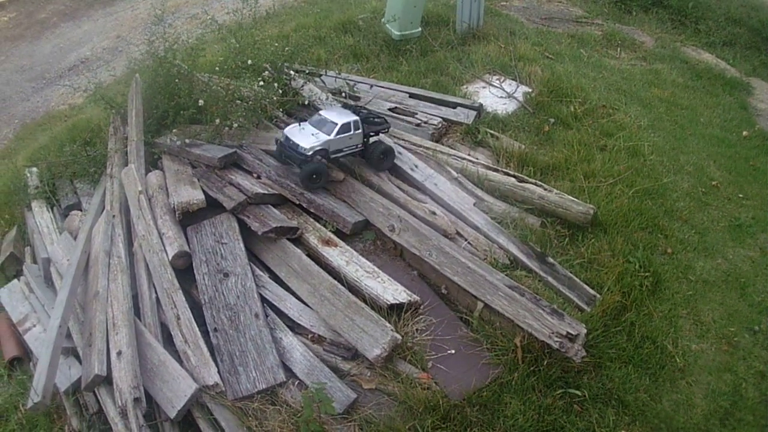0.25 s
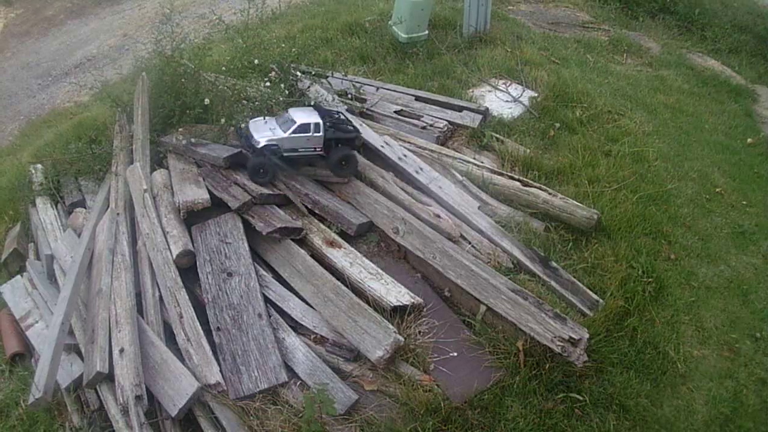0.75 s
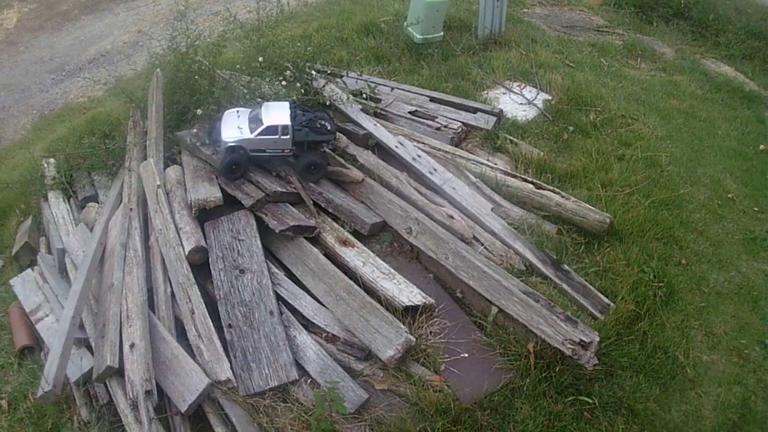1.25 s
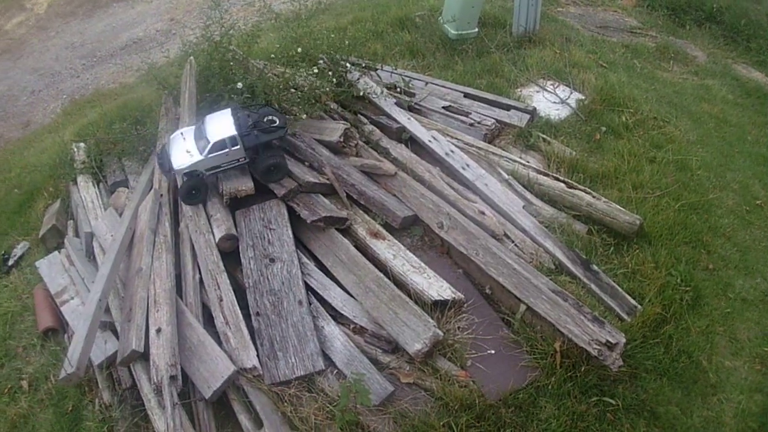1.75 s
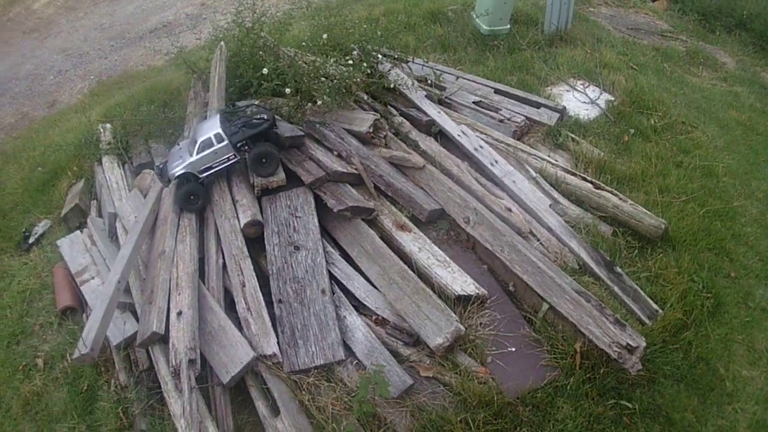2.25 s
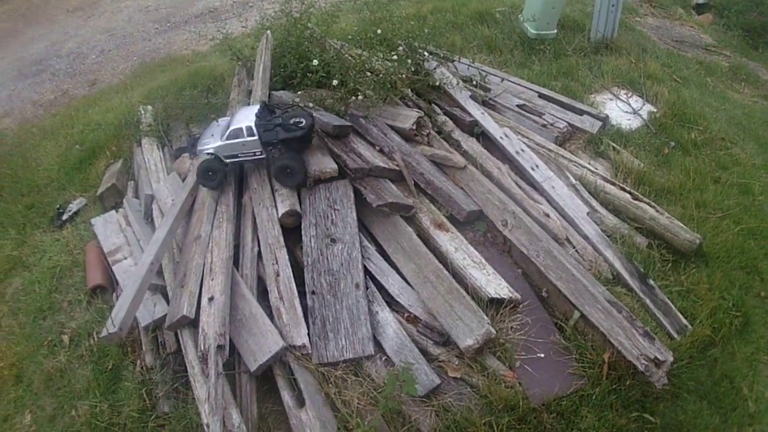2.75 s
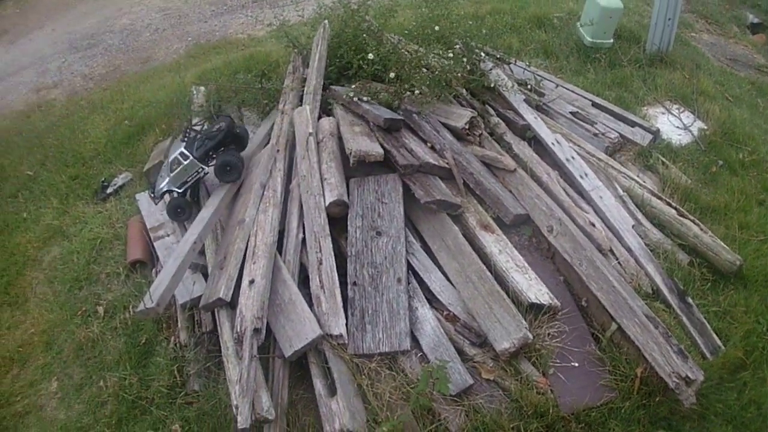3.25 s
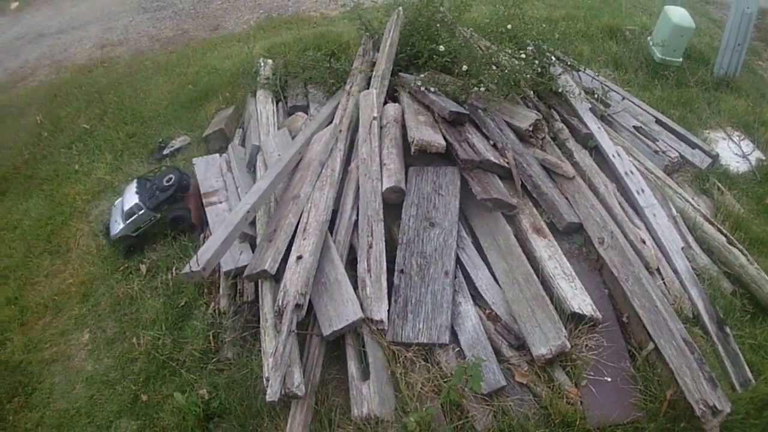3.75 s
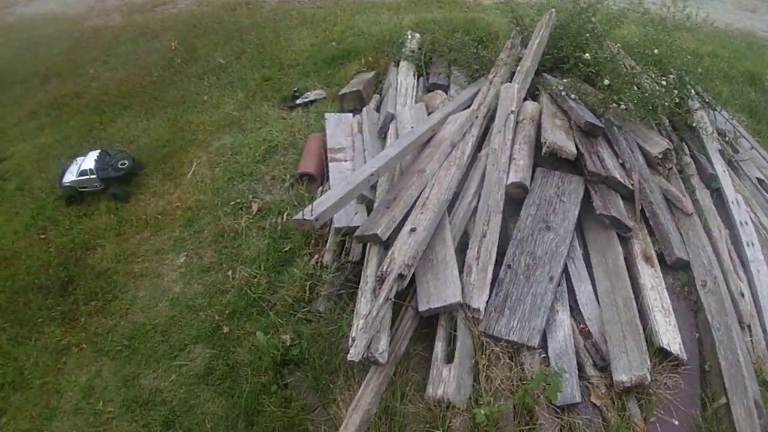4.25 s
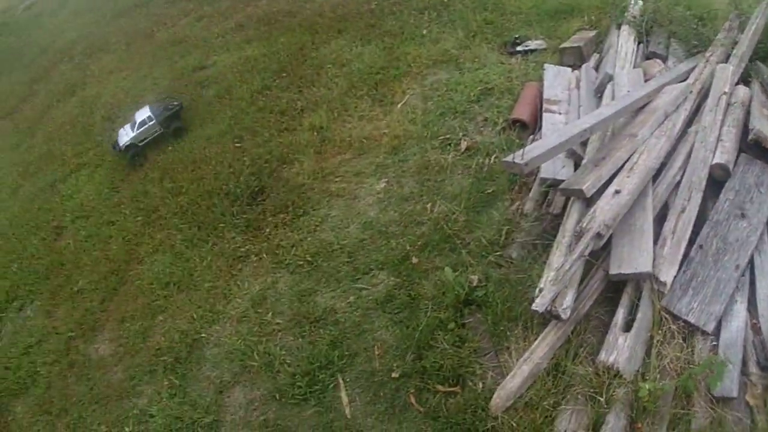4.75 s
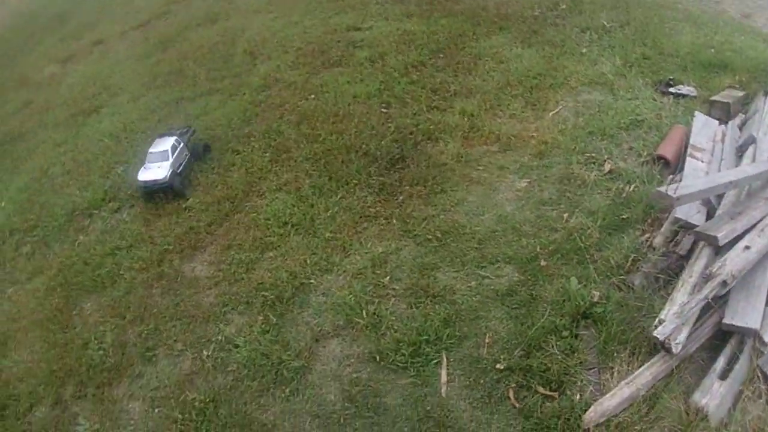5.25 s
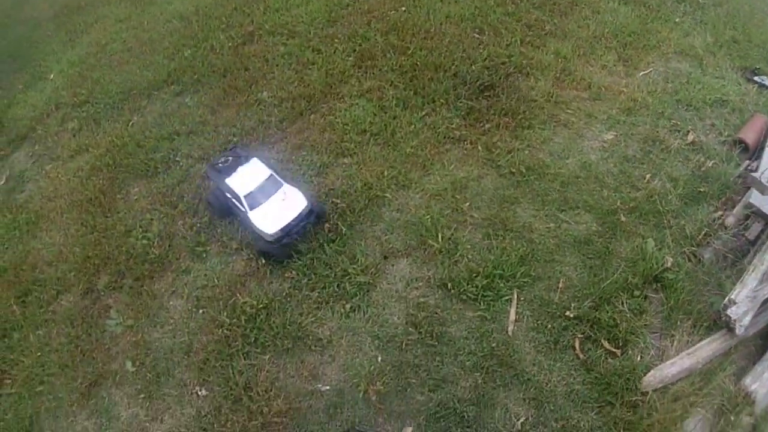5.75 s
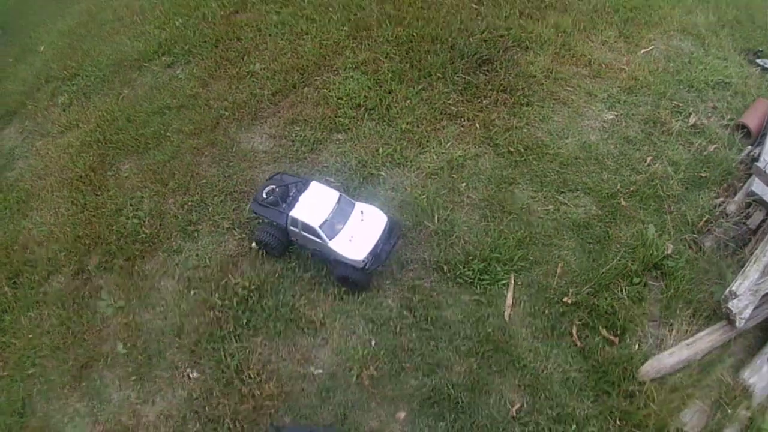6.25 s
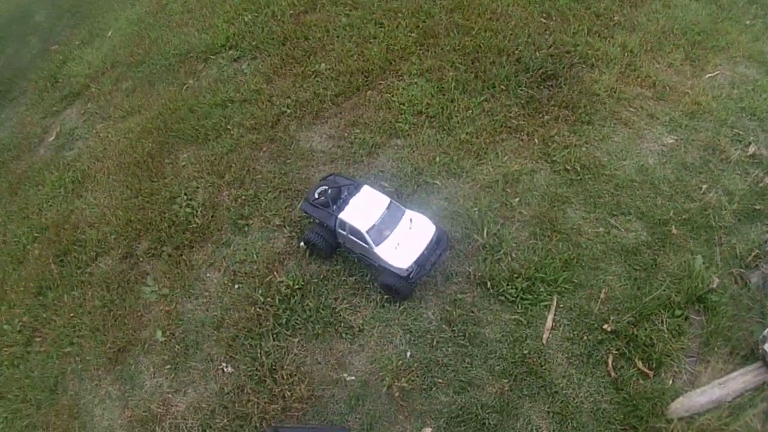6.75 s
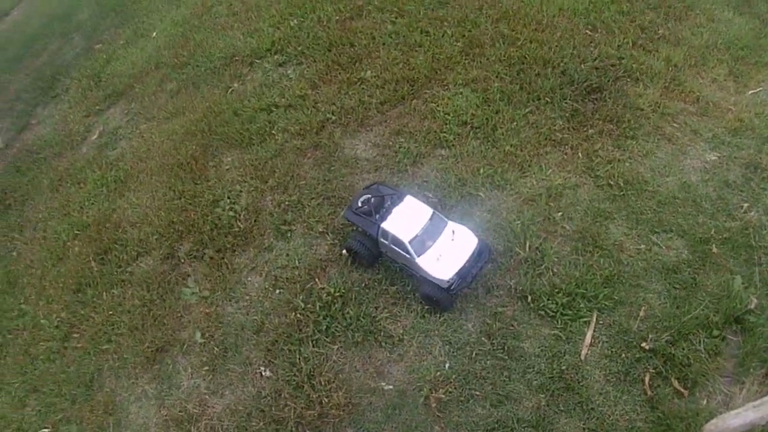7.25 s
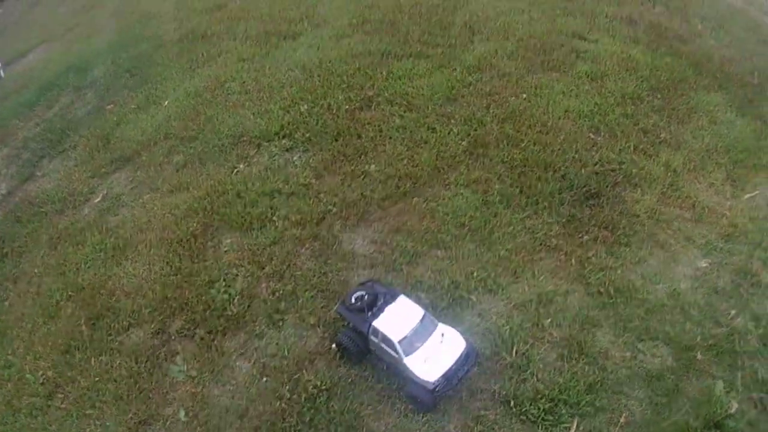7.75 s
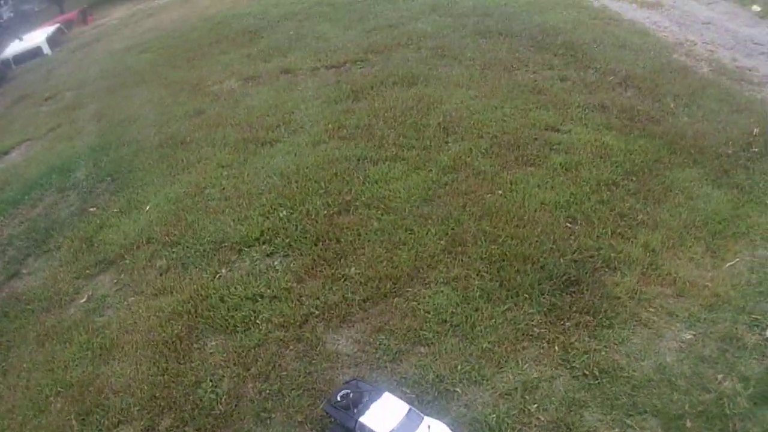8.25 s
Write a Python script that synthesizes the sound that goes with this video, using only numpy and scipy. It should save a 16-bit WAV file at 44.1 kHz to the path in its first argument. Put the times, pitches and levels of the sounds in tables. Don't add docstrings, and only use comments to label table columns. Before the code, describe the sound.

Heard from inside a sealed plastic camera case outdoors: a small electric toy car whines and hums faintly, its tyres scrubbing over loose planks with hollow knocks and tiny clicks. It rolls onto grass, quieter, with little squeaks, then brakes in a rattling ratchet. A hand slaps the case violently, clipping, followed by close rubbing and scattered taps, ending in a second loud burst.

```python
import sys
import numpy as np
from scipy import signal
from scipy.fft import rfft, irfft, next_fast_len
from scipy.io import wavfile
from scipy.ndimage import uniform_filter1d, map_coordinates

SR = 44100
rng = np.random.default_rng(int(sys.argv[2]) if len(sys.argv) > 2 else 0)


def master_out(mix):
    frames = np.transpose(np.atleast_2d(mix))
    ceiling = np.clip(frames, -1, 1)
    pcm = np.round(ceiling * 32767).astype(np.int16)
    wavfile.write(sys.argv[1], SR, pcm)


def gain_from_decibels(decibels):
    exponent = np.asarray(decibels, float) / 20
    return 10 ** exponent


N = 374906

# (frequency [Hz], level [dB])
FLOOR_COLOUR = [(110, -38), (180, -25), (215, -8), (263, -6.5), (353, -1), (421, -7), (876, -9),
                (1670, -23.5), (4720, -22.5), (5970, -42), (7760, -89), (13100, -120)]
# (frequency [Hz], level [dB])
RUMBLE_COLOUR = [(8, -33.5), (18, -1.5), (35, -3.5), (70, -4.5), (130, -6.5), (210, -10), (320, -19.5),
                 (600, -120)]
# (time [s], level [dB])
BREEZE = [(0.0, -63.5), (0.54, -61), (0.99, -56), (1.18, -60.5), (2.82, -54), (3.45, -63.5), (3.74, -60.5),
          (3.91, -57), (4.78, -70), (5.44, -59), (5.8, -63.5), (6.06, -63.5), (7.01, -66.5), (7.46, -60),
          (7.81, -67), (8.17, -68), (8.5, -59.5)]
# (time [s], frequency [Hz], level [dB])
DRONE = [
    [(4.15, 150, -72), (4.186, 140.2, -68), (4.592, 159.6, -61), (4.7, 136.7, -76)],
]
FLOOR_DB = -68

# (frequency [Hz], width [Hz], level [dB])
WALL = [(389.4, 160, -4.5), (516, 182, -1), (730, 256, 1.5), (1032, 245, 2.5), (1430, 560, -3)]
# (frequency [Hz], width [Hz], level [dB])
PORT = [(1980, 284, 3.5), (3004, 420, -1), (2955, 88, -3.5), (3584, 400, 5.5), (4480, 1090, -3)]
# (frequency [Hz], width [Hz], level [dB])
TOUCHED_PORT = [(1827, 240, 2), (2383, 410, -4), (3010, 180, 3), (3660, 300, -0.5), (4420, 420, -3),
                (5150, 520, -19.5)]
# (frequency [Hz], width [Hz], level [dB])
HELD_WALL = [(400, 160, -5.5), (638, 100, 0.5), (800, 120, 2), (1000, 200, -0.5), (1320, 260, -3)]
# (frequency [Hz], width [Hz], level [dB])
RIM = [(4604, 380, 0)]
MOUNT_HZ, MOUNT_DB, MOUNT_T60_S = 392, -31, .35
BLOW_TOP_HZ = 5300

# (time [s], peak [dB], click above it [dB], thud [Hz], swell [s])
TAPS = [(6.231, -18, -15, 571, 0.0025), (6.235, -13, -23, 514, 0.0011), (6.29, -37.5, 2.5, 800, 0.00085),
        (6.4, -31.5, -7, 650, 0.0039), (6.414, -39, 1, 790, 0.002), (6.904, -37, 9.5, 820, 0.0025),
        (7.554, -38.5, -15.5, 396, 0.0034), (7.562, -22.5, -30, 380, 0.002), (7.596, -33, -22, 400, 0.005),
        (7.616, -28.5, -23, 412, 0.0028), (7.633, -25.5, -8, 395, 0.0021), (7.651, -53, 1, 599, 0.0038),
        (6.372, -47, -12, 706, 0.0027), (7.129, -43, -5, 800, 0.0033), (8.104, -37.5, -1.5, 910, 0.0039),
        (8.161, -37, -1, 820, 0.0038), (8.234, -22, -16.5, 460, 0.0026), (8.265, -26, -14, 453, 0.0042),
        (8.311, -44, -11, 487, 0.0025), (8.3485, -11, -13, 834.7, 0.003), (8.366, -13.5, -39, 530, 0.0017),
        (8.38, -24.5, -4, 506.5, 0.0028)]
# (time [s], peak [dB], click above it [dB], thud [Hz], swell [s])
SLAP = [
    (6.2184, 0.3, -14, 445, .0046),
]
# (start [s], peak [s], end [s], pressure [dB], dryness [dB])
STROKES = [(6.227, 6.228, 6.31, -27, -10), (6.28, 6.297, 6.334, -39, -9), (6.368, 6.394, 6.51, -43, -7.5),
           (6.42, 6.575, 6.602, -44.5, -7), (6.615, 6.632, 6.69, -45, -8), (6.704, 6.73, 6.9, -51, -10),
           (6.803, 6.89, 7.03, -43, -10.5), (6.93, 6.959, 7.108, -46, -9), (7.11, 7.13, 7.135, -46, -9),
           (7.13, 7.158, 7.31, -40, -10), (7.289, 7.377, 7.48, -41, -11), (7.415, 7.5, 7.56, -45, -7),
           (7.54, 7.57, 7.61, -45, -8), (7.587, 7.607, 7.61, -36, -13.5), (7.608, 7.632, 7.643, -27.5, -13),
           (7.64, 7.646, 7.67, -43.5, -16), (8.063, 8.09, 8.19, -42.5, -3.5),
           (8.095, 8.165, 8.32, -44, 0.5), (8.165, 8.225, 8.27, -38, -4), (8.232, 8.256, 8.335, -36, -8.5),
           (8.356, 8.36, 8.405, -28, -12), (8.37, 8.405, 8.43, -37, -4.5), (8.427, 8.432, 8.7, -45, -10)]
# (start [s], peak [s], end [s], level [dB])
RIM_PRESSES = [(6.235, 6.253, 6.27, -45), (6.39, 6.4, 6.415, -50), (6.42, 6.474, 6.6, -53),
               (6.912, 6.96, 7.0, -52), (7.13, 7.16, 7.21, -50), (7.38, 7.438, 7.53, -52.5),
               (7.606, 7.61, 7.62, -33), (7.62, 7.633, 7.641, -28), (8.247, 8.265, 8.312, -52),
               (8.39, 8.405, 8.43, -44)]
# (time [s], level [dB])
DRY_STROKE = [
    [(8.066, -66), (8.258, -55.5), (8.31, -82)],
]
# (frequency [Hz], width [Hz], level [dB])
DRY_HISS = [(5346, 510, 0)]
# (time [s], peak [dB], frequency [Hz])
TICKS = [(6.2196, -23, 3900), (6.2204, -13, 700), (6.2214, -5, 2800), (6.2227, -19, 4100),
         (6.2909, -21, 3500), (6.4142, -33, 2600), (6.9055, -20, 3900), (7.5545, -35, 3300),
         (7.5635, -36, 3000), (7.6535, -44, 4200), (8.3125, -47, 2200), (2.85, -52, 4800),
         (3.112, -50, 4800), (2.459, -48, 2600), (2.765, -47, 3900), (2.009, -45, 1200), (3.018, -48, 1500),
         (3.988, -54, 900), (0.648, -50, 3500)]
# (frequency [Hz], level [dB])
SKIN_COLOUR = [(200, -4), (500, 1.5), (800, 0), (1300, -4), (3000, -22.5)]
# (frequency [Hz], level [dB])
SKIN_HISS_COLOUR = [(1200, -33), (2000, -10), (3500, -13), (4600, -9), (5100, -10.5), (5500, -18.5),
                    (6200, -20.5)]
STROKE_RISE_DB, STROKE_FALL_DB = 8, 13.5
HISS_GROWS, RIM_GROWS, RIM_DB = 1.5, 1.7, -13
SLAP_RING_DB = -18.5
TICK_S, TICK_TAIL_DB, TICK_TAIL_S = .00036, -13, .0012

# (time [s], peak [dB], click above it [dB], thud [Hz])
KNOCKS = [(0.109, -37.5, -15.5, 358), (0.189, -40.5, -9, 676), (0.204, -37, -29.5, 363),
          (0.224, -42, -6, 384), (0.955, -39, -12, 1000), (1.383, -35.5, -15, 415),
          (1.428, -38.5, -26, 340), (1.595, -44, -22, 540), (1.663, -37.5, -30, 410),
          (2.003, -35.5, -23, 850), (2.029, -40, -21, 457), (2.069, -37, -24, 413), (2.459, -41, -25, 994),
          (2.759, -36, -14, 457), (2.849, -51, -9, 618), (2.91, -46, -21, 550), (3.051, -43, -35, 324),
          (3.087, -38, -28, 820), (3.114, -45, -17, 543), (3.139, -42, -28, 603), (3.239, -48.5, -20, 950),
          (3.152, -38.5, -41, 467), (3.326, -49, -21, 950), (3.488, -46, -28, 760), (3.669, -47, -18, 299),
          (3.822, -36, -21, 367), (3.894, -38, -38, 242), (3.925, -40, -31, 355), (3.985, -47, -25, 272),
          (4.973, -42.5, -28, 360), (5.669, -45.5, -18, 357), (5.954, -40.5, -38, 396)]
# (time [s], peak [dB])
AXLE_CLICKS = [(0.104, -61), (0.266, -62), (0.552, -66.5), (0.647, -54), (0.688, -55.5), (0.765, -57),
               (0.832, -51.5), (0.9, -62), (0.949, -56), (1.236, -70), (1.441, -58), (1.615, -59.5),
               (1.722, -59), (1.85, -67), (1.975, -51), (2.008, -55), (2.038, -56), (2.064, -61),
               (2.108, -62), (2.457, -62), (2.764, -53), (3.018, -56.5), (3.097, -62), (3.11, -63),
               (3.716, -65), (4.527, -64), (4.608, -63), (4.838, -71), (4.963, -58), (5.296, -60),
               (5.377, -68)]
# (time [s], peak [dB])
RATCHET = [(5.753, -45), (5.776, -49), (5.796, -47), (5.812, -52), (5.8255, -51), (5.837, -55),
           (5.851, -57)]
# (frequency [Hz], width [Hz], level [dB])
AXLE = [(1730, 290, 1.5), (3500, 370, 4), (4000, 400, 2.5), (4450, 410, 2)]
# (start [s], peak [s], end [s], level [dB])
SHUDDERS = [(0.185, 0.198, 0.25, -46.5), (1.376, 1.382, 1.36, -39), (1.59, 1.647, 1.64, -46),
            (2.003, 2.01, 2.13, -43.5), (2.125, 2.14, 2.2, -51), (2.538, 2.667, 2.81, -43),
            (3.015, 3.02, 3.02, -48.5), (3.043, 3.077, 3.13, -46), (3.138, 3.152, 3.17, -45.5),
            (3.239, 3.24, 3.45, -58), (3.488, 3.492, 3.52, -59), (3.814, 3.825, 3.9, -49.5),
            (3.986, 3.984, 4.2, -58), (5.753, 5.8, 6, -52.5), (5.94, 5.955, 6.16, -58)]
# (frequency [Hz], width [Hz], level [dB])
PLANK = [(364, 87, 2), (494, 146, 1.5), (787, 236, -3.5), (1490, 290, -14)]
# (time [s], peak [dB], frequency [Hz])
SQUEAKS = [(0.192, -42, 3570), (2.729, -66.5, 3710), (3.438, -66, 4290), (3.6526, -48.5, 3650),
           (3.7444, -62, 3780), (3.9384, -53, 3880), (4.09, -54, 3860), (4.5783, -53, 3960),
           (5.2563, -50, 4000), (5.5441, -50.5, 3910), (5.625, -48, 4055)]
CLICK_DB, CLICK_THUD_HZ = 2.5, 474
GRASS_S, GRASS_DULLS_DB = 3.2, -4
CLATTER_COUNT, CLATTER_DB, CLATTER_SCATTER_DB, CLATTER_HZ = 60, 15, 2, 500

# (time [s], level [dB])
TYRE_LOAD = [(0.0, -59), (0.84, -57), (1.04, -59), (1.3, -47), (1.61, -53), (1.98, -52.5), (2.03, -46.5),
             (2.25, -52.5), (2.49, -49), (2.8, -48), (3.0, -55.5), (3.12, -56), (3.21, -59), (3.66, -50.5),
             (4.04, -58), (5.0, -54), (5.87, -51.5), (6.2, -65.5)]
# (start [s], peak [s], end [s], gears [dB], housing ring above them [dB])
BURSTS = [(0.0, 0.03, 0.4, -65.5, -0.5), (0.16, 0.226, 0.23, -63, -15), (0.252, 0.322, 1.6, -65, -3),
          (0.27, 0.328, 0.31, -71, 12), (0.442, 0.706, 0.87, -70, -2), (0.753, 0.97, 0.97, -58.5, 0),
          (0.989, 1.106, 0.82, -76, -5), (1.207, 1.29, 1.45, -69, 9.5), (1.287, 1.414, 1.57, -62.5, 3),
          (1.56, 1.62, 1.83, -67, 2.5), (1.84, 1.993, 2.16, -64, -8), (2.1, 2.127, 2.4, -69.5, -2),
          (2.422, 2.463, 2.68, -67.5, -3), (2.514, 2.67, 2.795, -55.5, 1), (2.63, 2.675, 2.715, -66, 6),
          (2.767, 2.81, 3.02, -66, -2), (2.996, 3.144, 3.28, -72.5, -7), (3.303, 3.626, 3.79, -66, -7),
          (3.7, 3.823, 4.07, -70, 2), (4.002, 4.49, 4.63, -68, -9), (4.593, 4.914, 5.23, -65, -1),
          (5.095, 5.412, 5.6, -63, -13), (5.494, 5.695, 5.86, -62, -9), (5.86, 5.9, 6.2, -73, -12)]
# (start [s], peak [s], end [s], level [dB])
BRAKE_CHATTER = [
    (5.746, 5.756, 5.885, -58),
]
# (frequency [Hz], level [dB])
SCRUB_COLOUR = [(150, -6), (350, 6), (700, -7), (1000, -3), (1500, -11), (3000, -24.5)]
# (frequency [Hz], level [dB])
GEAR_COLOUR = [(1200, -5.5), (2000, -8), (3000, -6), (4000, -12.5), (5000, -4.5), (6000, -7)]
# (time [s], frequency [Hz], level [dB])
SINGING = [
    [(2.53, 2900, -66), (2.62, 2960, -67), (2.66, 3050, -54), (2.685, 3100, -53), (2.712, 2954, -60),
     (2.78, 2960, -70)],
]
# (start [s], peak [s], end [s], level [dB])
HOLD = [(0.0, 0.01, 0.17, -51.5), (0.963, 0.968, 1.024, -46), (1.03, 1.25, 1.33, -49.5),
        (1.367, 1.42, 1.59, -53), (1.703, 1.81, 1.99, -48.5), (2.065, 2.453, 2.58, -51),
        (3.26, 3.433, 3.48, -58), (5.988, 6.024, 6.08, -63)]
# (start [s], crest [s], end [s], crest pitch [Hz], arc half-width [s])
WHINE = [(0.012, 0.035, 0.075, 1240, .07), (0.105, 0.138, 0.17, 1420, .075),
         (0.195, 0.208, 0.222, 1680, .022), (0.318, 0.319, 0.372, 1580, .055),
         (0.426, 0.45, 0.515, 1370, .1), (0.52, 0.587, 0.632, 1250, .085), (0.672, 0.688, 0.715, 1215, .16),
         (0.715, 0.768, 0.825, 1555, .062), (0.84, 0.875, 0.89, 1490, .05), (0.9, 0.94, 0.955, 1970, .17),
         (1.235, 1.278, 1.3, 1520, .062), (1.3, 1.33, 1.35, 1950, .05), (1.35, 1.36, 1.386, 1980, .3),
         (1.386, 1.392, 1.45, 2090, .042), (1.68, 1.682, 1.72, 927, .07), (1.77, 1.82, 1.88, 880, .13),
         (2.125, 2.13, 2.215, 1090, .135), (2.52, 2.57, 2.575, 1580, .13), (5.872, 5.89, 5.96, 1260, .085)]
WHINE_LOAD = [-1, -4, -4, -1, 1, -2, -1, -2, -6, -1, 1, -1, 1, -1, -1, -1, 0, -2, 1]
BURST_RISE_DB, BURST_FALL_DB = 7, 7.5
SPIN_DB, CHATTER_DB, RINGING_GROWS = 16, -1, 1.3
HOUSING_HZ, HOUSING_WIDTH_HZ, HOUSING_WANDERS = 2990, 300, .015
PINION_HZ, SWITCH_HZ = 3760, 975
WHINE_DB, WHINE_DB_PER_OCTAVE, WHINE_EDGE_DB = -48.5, -13, 3
GLIDE_HZ_PER_S, WHINE_FLUTTER_DB = 9000, 3.5
CLEAN_SHARE = .7

EDGE_HZ, OFFSET, CEILING = 6290, .0048, .72


def along(points, hz):
    f, v = np.transpose(points)
    return np.interp(np.log(hz + 1), np.log(f + 1), v)


def unit(x):
    return x / np.sqrt(np.mean(x ** 2) + 1e-20)


def curves(tables, fade=0.002):
    t = np.arange(N) / SR
    s, *cols = np.transpose(np.concatenate(tables))
    gates = []
    for rows in tables:
        inside = np.minimum(t - rows[0][0], rows[-1][0] - t)
        gates.append(np.clip(inside / fade + 1, 0, 1))
    return [np.interp(t, s, c) for c in cols] + [np.minimum(sum(gates), 1)]


def wobble(rate):
    coarse = np.arange(0, N + 8, 8)
    knots = rng.standard_normal(int(N * rate / SR) + 4)
    return np.interp(np.arange(N), coarse, map_coordinates(knots, [coarse * rate / SR]))


def filtered(x, response):
    m = next_fast_len(len(x) + 8192)
    return irfft(rfft(x, m) * response(np.fft.rfftfreq(m, 1 / SR)), m)[:len(x)]


def ringing(modes):
    def response(f):
        total = 0
        for k, (centre, width, db) in enumerate(modes):
            damping = 1j * f * width
            total = total + (-1) ** k * gain_from_decibels(db) * damping / (centre * centre - f * f + damping)
        return total
    return response


def band(modes):
    return unit(filtered(rng.standard_normal(N), lambda f: ringing(modes)(f) ** 2))


def grit(colour, modes, grain_db, grain_rate):
    rough = rng.standard_normal(N) * gain_from_decibels(grain_db * wobble(grain_rate))
    return unit(filtered(rough, lambda f: gain_from_decibels(along(colour, f)) * ringing(modes)(f)))


def fuzzy(hz, width_hz):
    turn = 2 * np.pi * np.cumsum(hz) / SR
    return unit(wobble(width_hz) * np.cos(turn) + wobble(width_hz) * np.sin(turn))


def patchy(x, depth_db, size=(5, 9)):
    z = signal.stft(x, nperseg=512)[2]
    field = uniform_filter1d(rng.standard_normal(z.shape), size[0], 0)
    field = uniform_filter1d(field, size[1], 1)
    return unit(signal.istft(z * gain_from_decibels(depth_db * unit(field)), nperseg=512)[1][:N])


def progress(start, peak, end):
    at = np.arange(round(start * SR), min(round(end * SR), N))
    lag = at / SR - peak
    return at, lag / np.where(lag < 0, max(peak - start, 1e-3), max(end - peak, 1e-3))


def swells(events, peaks_db, rise_db, fall_db, edge=0.002):
    power = np.zeros(N)
    for (start, peak, end, *_), db in zip(events, peaks_db):
        at, u = progress(start, peak, end)
        power[at] += gain_from_decibels(2 * (db + np.where(u < 0, rise_db * u, -fall_db * u)))
    return np.sqrt(np.abs(uniform_filter1d(power, max(int(edge * SR), 1))))


def throttle(extra_db, grows):
    peaks_db = np.array(BURSTS)[:, 3] + extra_db
    return swells(BURSTS, peaks_db, grows * BURST_RISE_DB, grows * BURST_FALL_DB, edge=0.012)


def blows(events, port, firm, wall_db, click_db, click_t60):
    thuds, pushes, clicks = np.zeros((3, N + SR))
    t = np.arange(SR // 20) / SR
    for s, db, sharp_db, hz, swell in events:
        at = slice(round(s * SR), round(s * SR) + len(t))
        noise = rng.standard_normal((2, len(t)))
        contact = (t / swell * np.exp(1 - t / swell)) ** firm
        thuds[at] += gain_from_decibels(db) * contact * np.sin(2 * np.pi * hz * t)
        pushes[at] += gain_from_decibels(db + wall_db) * contact * noise[0]
        decay_db = -60 * np.abs(t - 0.54 * swell) / click_t60
        clicks[at] += gain_from_decibels(db + sharp_db + click_db + decay_db) * noise[1]
    driven = [(hz, 0.87 * width, db) for hz, width, db in port]
    blow = thuds + filtered(pushes, ringing(WALL)) + filtered(clicks, ringing(driven))
    return signal.sosfilt(signal.butter(8, BLOW_TOP_HZ, fs=SR, output="sos"), blow)[:N]


def outdoors():
    breeze_db, _ = curves([BREEZE])
    floor_noise = unit(filtered(rng.standard_normal(N), lambda f: gain_from_decibels(along(FLOOR_COLOUR, f))))
    rumble = unit(filtered(rng.standard_normal(N), lambda f: gain_from_decibels(along(RUMBLE_COLOUR, f))))
    return gain_from_decibels(FLOOR_DB) * floor_noise + gain_from_decibels(breeze_db + 2.5 + 1.3 * wobble(9)) * rumble


def drone():
    hz, db, gate = curves(DRONE, fade=0.066)
    return gate * gain_from_decibels(db) * (fuzzy(hz, width_hz=30) + 0.7 * fuzzy(hz * 0.53, width_hz=9.7))


def mounted(x):
    width_hz = np.log(1000) / np.pi / MOUNT_T60_S
    return x + filtered(x, ringing([(MOUNT_HZ, width_hz, MOUNT_DB + 29)]))


def rubbing():
    pressure_db, dryness_db = np.array(STROKES)[:, 3:].T

    def stroke(db, grows):
        return swells(STROKES, db, grows * STROKE_RISE_DB, grows * STROKE_FALL_DB)

    presses = swells(RIM_PRESSES, np.array(RIM_PRESSES)[:, 3], 3.9, 8)
    squeal = np.hypot(stroke(pressure_db + dryness_db + RIM_DB, RIM_GROWS), presses)
    slips = wobble(60)
    skin = patchy(grit(SKIN_COLOUR, HELD_WALL, grain_db=0.9, grain_rate=190), depth_db=2.5, size=(3, 9))
    wall = stroke(pressure_db, 1) * gain_from_decibels(-2.5 + 0.39 * slips) * skin
    fine = patchy(grit(SKIN_HISS_COLOUR, TOUCHED_PORT, grain_db=1.5, grain_rate=920), depth_db=2.5)
    hiss = stroke(pressure_db + dryness_db, HISS_GROWS) * gain_from_decibels(0.28 * slips) * fine
    rim = squeal * gain_from_decibels(-3.0 + 1.8 * slips) * band(RIM)
    dry_db, sliding = curves(DRY_STROKE)
    return wall + hiss + rim + sliding * gain_from_decibels(dry_db) * band(DRY_HISS)


def touches():
    slap = blows(SLAP, TOUCHED_PORT, firm=11, wall_db=-5.0, click_db=9, click_t60=0.004)
    taps = blows(TAPS, TOUCHED_PORT, firm=2.94, wall_db=3.0, click_db=12.0, click_t60=.007)
    share = gain_from_decibels(SLAP_RING_DB)
    return mounted(rubbing() + taps + share * slap) + (1 - share) * slap


def ticks():
    out = np.zeros(N + SR)
    t = np.arange(-SR // 500, SR // 100) / SR
    snap = np.exp(-(t / TICK_S) ** 2)
    shape = snap + gain_from_decibels(TICK_TAIL_DB) * (t > 0) * np.exp(-t / TICK_TAIL_S)
    for s, db, hz in TICKS:
        cycles = np.cos(2 * np.pi * hz * t * (1 - 40 * np.abs(t)))
        out[round((s + t[0]) * SR):][:len(t)] -= gain_from_decibels(db) * shape * cycles
    return out[:N]


def planks():
    rocking = swells(SHUDDERS, np.array(SHUDDERS)[:, 3], 5.4, 9.3)
    bumps = rng.standard_normal(N) * gain_from_decibels(3.5 * wobble(90))
    return rocking * unit(filtered(bumps, ringing(PLANK)))


def chassis():
    clicks = [(s, db, CLICK_DB, CLICK_THUD_HZ) for s, db in AXLE_CLICKS]
    when = GRASS_S * rng.random(CLATTER_COUNT)
    size, pitch = rng.standard_normal((2, CLATTER_COUNT))
    push_db = 20 * np.log10(throttle(0, 1)[(when * SR).astype(int)] + 1e-6)
    clatter_db = push_db + CLATTER_DB + CLATTER_SCATTER_DB * size
    clatter_hz = CLATTER_HZ * np.exp(0.32 * pitch)
    clatter = [(s, db, -24, hz) for s, db, hz in zip(when, clatter_db, clatter_hz)]
    knocks = [(*knock, .003) for knock in KNOCKS + clicks + clatter]
    return blows(knocks, PORT, firm=2.6, wall_db=-1.5, click_db=9.0, click_t60=0.01)


def ratchet():
    clicks = [(s, db, CLICK_DB, CLICK_THUD_HZ, .003) for s, db in RATCHET]
    return blows(clicks, AXLE, firm=2.6, wall_db=0.1, click_db=11.5, click_t60=0.012)


def squeaks():
    out = np.zeros(N + SR)
    t = np.arange(SR // 10) / SR
    swell = (t / 0.022 * np.exp(1 - t / 0.016)) ** 2
    for s, db, hz in SQUEAKS:
        grainy = 1 + 0.98 * np.repeat(rng.standard_normal(len(t) // 90 + 1), 90)[:len(t)]
        tone = np.sin(2 * np.pi * hz * t * (1.03 - 0.784 * t))
        out[round(s * SR):][:len(t)] += gain_from_decibels(db - 8.5) * swell * grainy * tone
    return out[:N]


def drive():
    load_db, gate = curves([TYRE_LOAD], fade=.01)
    lumps = wobble(21.99)
    spin = gain_from_decibels(SPIN_DB) * throttle(0, 0.97) * (np.arange(N) < GRASS_S * SR)
    bearing = np.hypot(gate * gain_from_decibels(load_db), spin)
    scrub = bearing * gain_from_decibels(-3.5 + 1.5 * lumps) * grit(SCRUB_COLOUR, WALL, grain_db=1, grain_rate=160)
    teeth = patchy(grit(GEAR_COLOUR, PORT, grain_db=2.0, grain_rate=240), depth_db=2.5)
    hiss = throttle(0, 0.66) * gain_from_decibels(-1.5 + 1.1 * lumps + 1.5 * wobble(30)) * teeth
    return scrub + hiss


def gearbox():
    ring = throttle(np.array(BURSTS)[:, 4], RINGING_GROWS) * gain_from_decibels(-5 + 5 * wobble(22))
    ring = ring * fuzzy(HOUSING_HZ * (1 + HOUSING_WANDERS * wobble(14)), width_hz=HOUSING_WIDTH_HZ)
    weak_db = 0.36 * np.minimum(np.array(BURSTS)[:, 3] + 64, 0)
    braking = swells(BRAKE_CHATTER, [BRAKE_CHATTER[0][3]], 8.9, 6.5)
    shake = np.hypot(throttle(CHATTER_DB + weak_db, RINGING_GROWS), braking)
    rattle = shake * gain_from_decibels(-5.0 + 3.0 * wobble(28))
    return ring + rattle * fuzzy(PINION_HZ * (1 + .035 * wobble(9)), width_hz=750)


def singing():
    hz, db, gate = curves(SINGING, fade=.01)
    return gate * gain_from_decibels(db + 2.5 * wobble(45)) * fuzzy(hz, width_hz=45)


def controller():
    holding = swells(HOLD, np.array(HOLD)[:, 3], 5.7, 6.4)
    tone = np.sin(2 * np.pi * np.cumsum(SWITCH_HZ + 0.5 * wobble(11.46)) / SR)
    return holding * tone * gain_from_decibels(2 + 0.98 * wobble(40.25))


def mesh_pitch():
    hz = np.full(N, 1000.)
    for start, crest, end, top_hz, arc in WHINE:
        at, _ = progress(start - .008, crest, end + .008)
        at = at[at >= 0]
        hz[at] = top_hz / (1 + ((at / SR - crest) / arc) ** 2)
    return uniform_filter1d(hz, SR // 90)


def whine():
    hz = mesh_pitch()
    middles = [(start, (start + end) / 2, end) for start, _, end, *_ in WHINE]
    peaks_db = [WHINE_DB + db + GRASS_DULLS_DB * (arc[0] > GRASS_S) for arc, db in zip(WHINE, WHINE_LOAD)]
    surging = swells(middles, peaks_db, WHINE_EDGE_DB, WHINE_EDGE_DB)
    dulled = gain_from_decibels(WHINE_DB_PER_OCTAVE * np.maximum(np.log2(hz / 1200), 0))
    glide = np.abs(np.gradient(hz)) * SR / GLIDE_HZ_PER_S
    slipping = np.sqrt(1 + np.minimum(glide, 1))
    flutter = gain_from_decibels(WHINE_FLUTTER_DB * wobble(35) - 1)
    clean = np.sin(2 * np.pi * np.cumsum(hz * (1 + .022 * wobble(60))) / SR)
    rough = .55 * fuzzy(hz, width_hz=150) + .3 * fuzzy(hz * .72, width_hz=140)
    return surging * dulled * slipping * flutter * (CLEAN_SHARE * clean + rough)


def scene():
    background = outdoors() + drone()
    fingers = touches() + ticks()
    wood = planks() + chassis() + ratchet()
    car = squeaks() + drive() + gearbox() + singing() + controller() + whine()
    return (background + fingers + wood + car)[None]


def band_limit(x):
    return signal.sosfilt(signal.butter(12, 15800, fs=SR, output="sos"), x)


def record(dry):
    x = signal.sosfilt(signal.cheby2(22, 70, EDGE_HZ, fs=SR, output="sos"), dry) + OFFSET
    x = x / (1 + np.abs(x / CEILING) ** 10) ** (1 / 10)
    return band_limit(x)


dry = scene()
out = record(dry)
master_out(out)
```